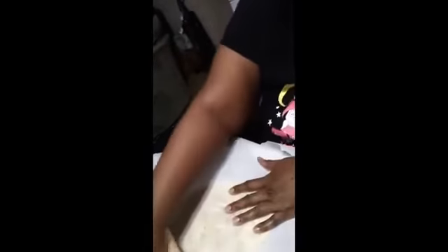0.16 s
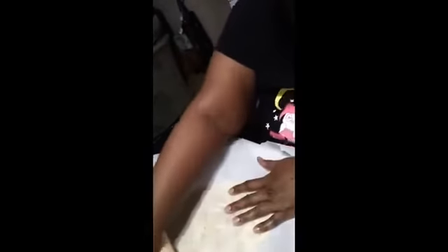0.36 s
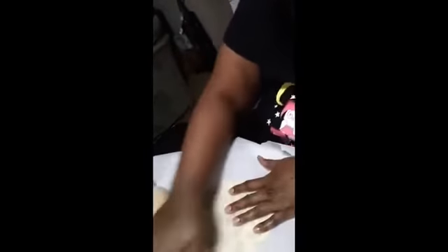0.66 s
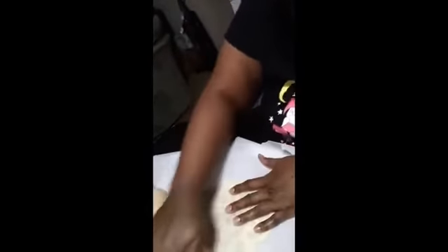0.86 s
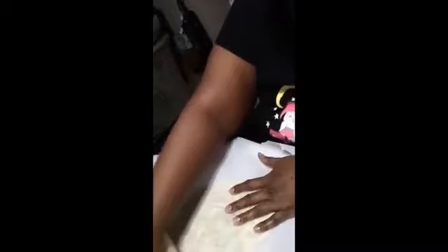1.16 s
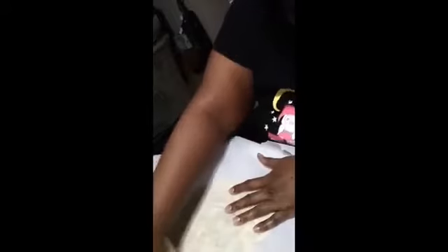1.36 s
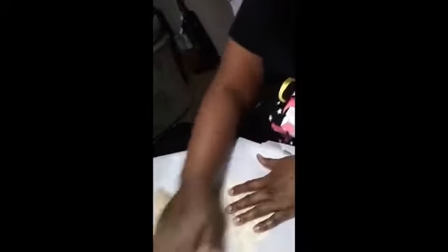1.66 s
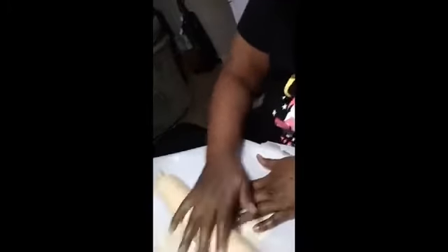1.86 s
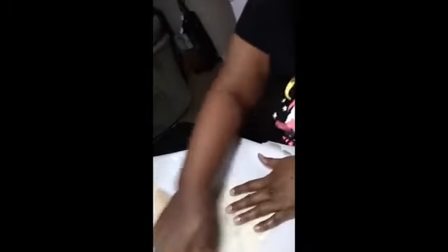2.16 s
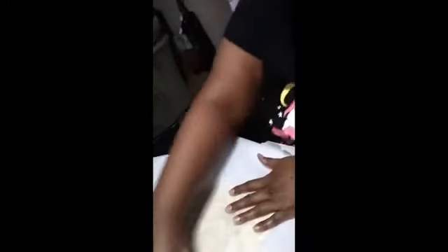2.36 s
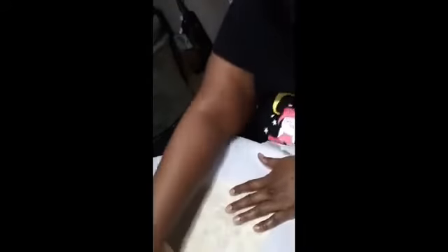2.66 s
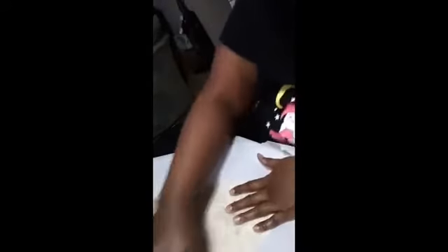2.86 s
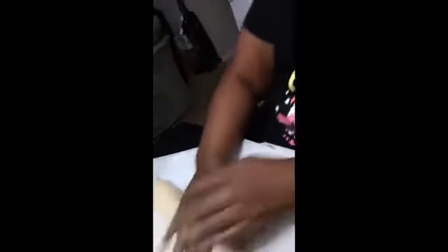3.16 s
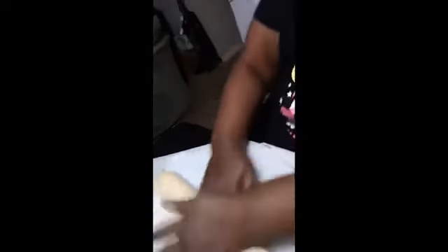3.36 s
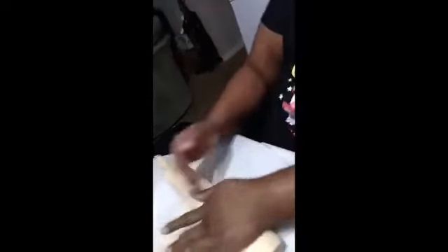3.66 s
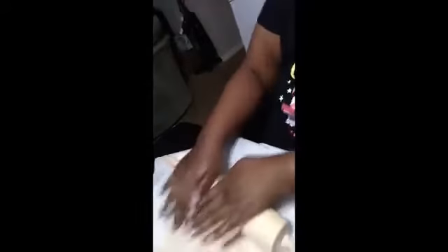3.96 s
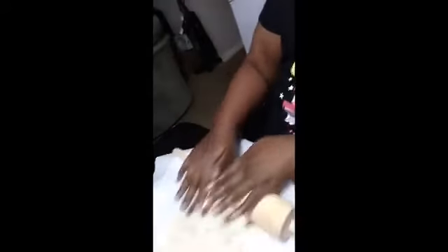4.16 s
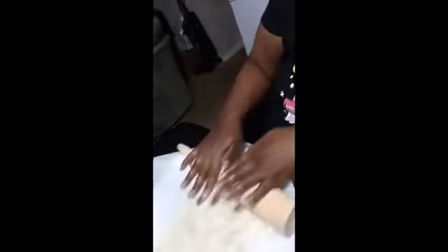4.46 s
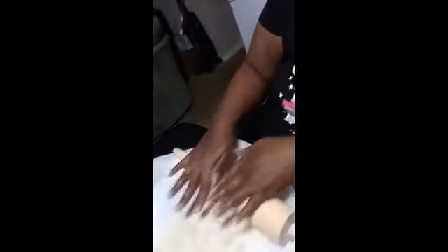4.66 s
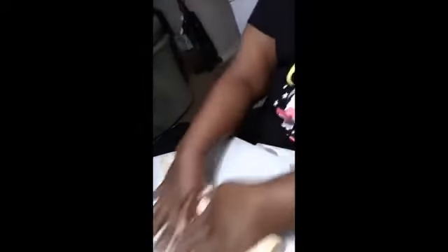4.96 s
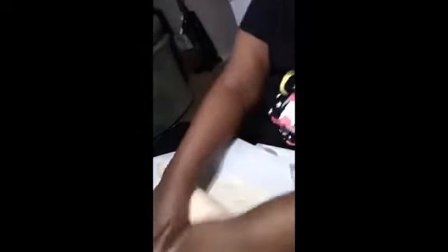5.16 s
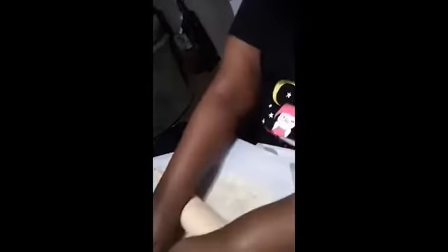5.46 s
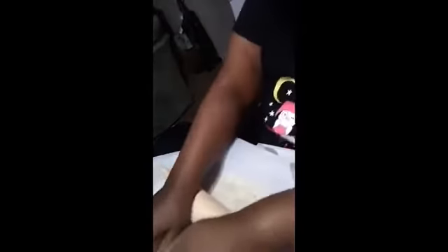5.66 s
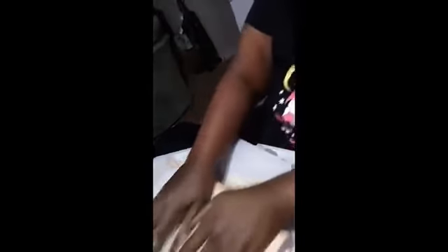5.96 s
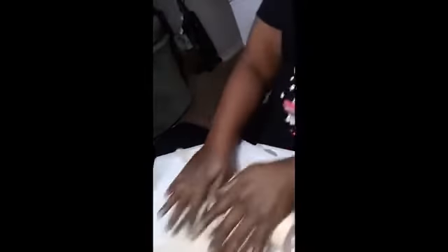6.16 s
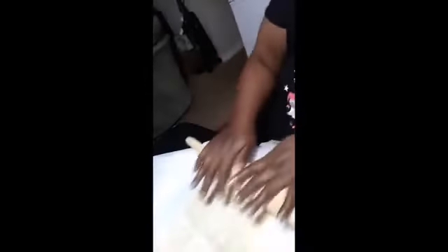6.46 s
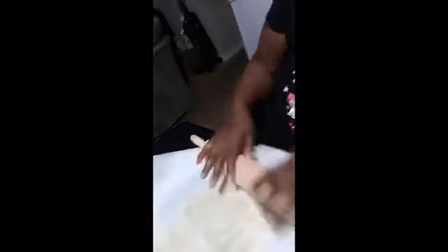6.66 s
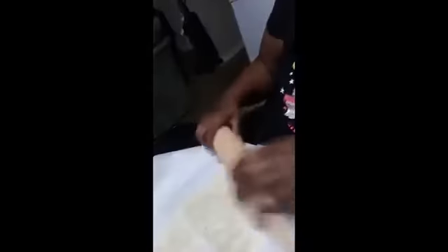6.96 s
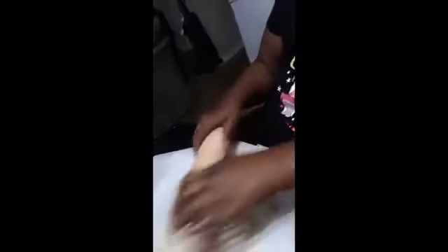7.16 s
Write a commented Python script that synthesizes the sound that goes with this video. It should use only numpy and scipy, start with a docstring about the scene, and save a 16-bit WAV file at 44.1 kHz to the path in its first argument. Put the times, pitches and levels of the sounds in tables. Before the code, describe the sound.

Hands work a wooden pin over paper-covered dough on a kitchen counter. The sheet crinkles busily, its creases ticking and popping, with low flutter beneath each stroke. After about four seconds the snapping becomes sparser, with a longer papery slide near five seconds and dull bumps near seven. Close microphones, little reverberation, quiet room.

```python
"""Parchment paper rubs under a wooden pin rolling out dough, close to two microphones: noise powered by
friction, tiny crackles, bursts at each push and creases snapping. Later the hands slide it with a smoother swish.
Panels pop (single modes) and the sheet flutters (low noise). The pin trundles (uneven low noise) and knocks
softly (ringing modes of counter and wood), over the low air noise and faint sine hum of a small kitchen."""
import sys
import numpy as np
from scipy import signal
from scipy.fft import rfft, irfft, next_fast_len
from scipy.io import wavfile
from scipy.ndimage import uniform_filter1d, map_coordinates

SR = 44100
rng = np.random.default_rng(int(sys.argv[2]) if len(sys.argv) > 2 else 0)


def transcribe(signal):
    """Save signal, clipped to [-1, 1], as a 16-bit WAV file at the path in sys.argv[1]."""
    frames = np.atleast_2d(signal).T
    limited = np.clip(frames, -1, 1)
    pcm = np.round(limited * 32767).astype(np.int16)
    wavfile.write(sys.argv[1], SR, pcm)


N = 321930
TIME_S = np.arange(N) / SR
PADDED = 2 * next_fast_len(N // 2 + 4096)
FREQ_HZ = np.maximum(np.arange(PADDED // 2 + 1) * SR / PADDED, 1)

# All dB columns are relative unless marked RMS.
# bursts of rustle as the sheet is pushed or dragged: [t/s, length/s, level/dB, body/dB, crispness/dB]
PUSHES = [(0.108,0.031,-41,-13,-2), (0.282,0.039,-35,0,-10), (0.467,0.24,-34.5,-1,-3),
          (0.695,0.045,-25.5,-3.5,-3.5), (0.764,0.067,-25,-3.5,-4), (0.972,0.016,-29,-4,-4),
          (1.141,0.025,-25.5,-9,-6.5), (1.314,0.016,-28.5,-9,-4), (1.41,0.12,-36,-6,1),
          (1.53,0.027,-25,-3.5,-5.5), (1.692,0.009,-32,-17,-4), (1.744,0.073,-34,-1,-4),
          (1.836,0.04,-43.5,1,13), (2.091,0.11,-45,3.5,3), (2.29,0.18,-36,-1.5,-6), (2.482,0.032,-32,-4,-4),
          (2.697,0.0072,-22,-9,-6.5), (2.85,0.079,-42,3,-6), (3.017,0.12,-25,-4.5,-4),
          (3.094,0.037,-20.5,-5,-2), (3.22,0.057,-36.5,-1.5,-2), (3.362,0.18,-33,-1.5,2),
          (3.617,0.14,-29,-9,0), (3.834,0.027,-38,-24,5.5), (3.942,0.12,-28,-8.5,-9),
          (4.104,0.026,-26.5,-8,-8), (4.228,0.034,-30.5,-9,-2.5), (4.325,0.031,-26.5,-10.5,-5),
          (4.61,0.04,-43,-7,2.5), (4.73,0.018,-34.5,-6,-4), (4.96,0.03,-33,-1.5,-14),
          (5.086,0.19,-25.5,-12,1), (5.326,0.077,-27.5,-7.5,3), (5.559,0.024,-35.5,-26,6),
          (5.705,0.017,-36.5,-8,-4), (6.23,0.14,-38,-2,-9), (6.498,0.0079,-34.5,-5,-3),
          (6.603,0.023,-32,-8,-13), (6.762,0.08,-33,-8.5,-2), (6.927,0.13,-36.5,-4,-3.5)]
PUSH_ATTACK_S, PUSH_RELEASE_S, PUSH_SAG_DB_PER_S = 0.014, 0.032, 5
# below this share of crackles the sheet slides: attack grows by up to SLIDE_SWELL_S
SLIDE_SWELL_S, SLIDE_BELOW_SHARE = 0.13, 0.39
# light rubbing between pushes, nearly silent when the pin rests or is lifted: [t/s, level/dB]
RUBBING = [(0, -35), (.24, -40), (.6, -36), (.92, -39), (1.03, -43), (1.08, -38), (1.22, -40.5),
           (1.95, -39.5), (2.03, -48.5), (2.14, -42.5), (2.9, -37), (3.9, -44), (4.46, -41), (4.57, -70),
           (4.62, -44), (5.3, -37.5), (5.9, -40), (7.09, -47.5), (7.17, -52), (7.21, -60.5), (7.3, -72)]
# tone of the light rubbing, fuller under the first strokes: [t/s, body/dB, crispness/dB]
RUB_TONE = [(0, 1, -3.5), (1.9, -0.5, -3), (3.7, -1.5, -3.5), (4.2, -2.5, -5.5), (5.2, -5, -6), (6, -3, -5),
            (7.3, -4, 3.5)]
# share of rustle that is tiny crackles, the rest being smooth friction: [t/s, share/0-1]
CRINKLE_SHARE = [(0, 0.56), (1.9, 0.62), (3.7, 0.63), (4.1, 0.35), (4.5, 0.37), (4.9, 0.7), (5.1, 0.17),
                 (5.45, 0.06), (5.9, 0.57), (6.6, 0.27), (6.9, 0.27), (7.3, 0.48)]
# creases snapping through: [t/s, level/dB, body/dB, brightness/dB, length scale/s]
SNAPS = [(0.057, -22, -10.0, 0, 0.0015), (0.0677, -30, 0, 5, 0.0021), (0.0912, -29, -1, 13, 0.0012),
         (0.1074, -14.5, -8, 3, 0.0022), (0.192, -25.5, 1, 4.5, 0.0021), (0.2833, -21.5, 1.5, 7, 0.002),
         (0.3139, -18.5, -0.5, 6, 0.0035), (0.3472, -23.5, -15, 3.5, 0.0047),
         (0.409, -21.5, -5, 0.5, 0.003), (0.426, -17, -14.5, -1, 0.0021), (0.5229, -28, -8, 10.5, 0.002),
         (0.5664, -21.5, -4, -6, 0.003), (0.6037, -27.5, 5.5, 6, 0.0017), (0.6198, -21, -5, -2, 0.0018),
         (0.6397, -18, -2.5, 2.5, 0.0042), (0.6639, -16.5, -17, -1, 0.0035),
         (0.6728, -17, -7.5, -4, 0.0026), (0.7558, -14, -7.5, 0.5, 0.0021), (0.8019, -16.5, -16, 1, 0.002),
         (0.8137, -21.5, -15, 7.5, 0.0028), (0.8502, -20, -2, -8, 0.0039), (0.8594, -14, -8, -1.5, 0.0039),
         (0.9556, -20, -3, 1, 0.0019), (0.9879, -15, -6.5, 4.5, 0.002), (1.0218, -17.5, -1, -4, 0.0013),
         (1.0485, -19.5, -1, 3, 0.0022), (1.1065, -22, -6.5, 0, 0.002), (1.1485, -23, -3, 7.5, 0.0035),
         (1.1587, -20, 1, 4.5, 0.0032), (1.2442, -26.5, -5.5, 5, 0.0045), (1.2908, -23, -2, 4, 0.0019),
         (1.3103, -17, -13, 6, 0.0021), (1.3213, -21, -19, 6, 0.003), (1.324, -20, 0, -0.5, 0.0019),
         (1.3504, -19, -6, 5, 0.0015), (1.5017, -18.5, -4, 10, 0.0014), (1.5402, -17, -15, 3.5, 0.0041),
         (1.6241, -20.5, -2, 5, 0.0023), (1.6629, -20.5, -11, 5, 0.0022), (1.694, -18.5, -3, 1, 0.0019),
         (1.6985, -16.5, -6, 5.5, 0.003), (1.7512, -20, -1, 3, 0.0026), (1.8233, -19, 0, 3, 0.0033),
         (1.8274, -17, -1, 4, 0.0015), (1.8997, -30.5, -12, 7, 0.003), (1.9762, -25.5, -0.5, -17, 0.002),
         (2.0356, -34.5, -6, -5.5, 0.0039), (2.0974, -27, -6.5, -12, 0.0016), (2.1264, -22, -5, -6, 0.0011),
         (2.1415, -25, -9, 4, 0.0018), (2.1953, -25, -1.5, 1.5, 0.0016), (2.2767, -24.5, -2, 1, 0.0023),
         (2.3256, -22, -3, -3, 0.0028), (2.3728, -22.5, -11, 9, 0.0016), (2.4558, -17, -2, 6, 0.0019),
         (2.5039, -23.5, -3, 5.5, 0.0032), (2.5301, -19, -3.5, 0, 0.0016), (2.5993, -25, -6, 1, 0.0017),
         (2.6278, -24.5, -8, 5.5, 0.0014), (2.6153, -22, -8, -1, 0.0019), (2.6367, -26, 1, 4, 0.0013),
         (2.666, -14, -16, 1.5, 0.0019), (2.7085, -15, -6.5, -1, 0.0025), (2.821, -25, -2, 0, 0.0026),
         (2.8508, -22.5, -3, 2, 0.0029), (2.9094, -28.5, 6, 0, 0.0026), (2.8656, -20, 1, 3, 0.0015),
         (2.8969, -25, -4, -1, 0.0026), (2.9319, -14, -4.5, -1, 0.0028), (2.983, -15.5, -6, 5.5, 0.0017),
         (3.0455, -19, -2, 8.0, 0.0012), (3.0595, -21, -4, 6, 0.0031), (3.0961, -19, -17, -1, 0.0079),
         (3.1102, -11.5, -3, 6, 0.002), (3.1227, -25, 0, -8, 0.0028), (3.1441, -19, -11, 0, 0.0063),
         (3.2198, -24.5, -2, 4.5, 0.0046), (3.2326, -18, -6.5, 7, 0.0021), (3.3654, -9, -14.5, 4, 0.0014),
         (3.3751, -17, 1.5, 2, 0.0009), (3.4029, -19, 2, 6, 0.0011), (3.497, -23.5, -3.5, 0, 0.0033),
         (3.5186, -18, -12.5, 3.5, 0.0059), (3.5618, -20, -5, -5, 0.0012), (3.6124, -27, -0.5, 5, 0.0049),
         (3.6388, -32, 2.5, 9, 0.0056), (3.6934, -16, -7.5, 5.5, 0.0046), (3.7646, -27, -10, 3, 0.0056),
         (3.832, -30, -14, 7, 0.0022), (3.9589, -27.5, -17, 13, 0.0021), (3.9842, -28.5, 1, 4, 0.0048),
         (4.0101, -16, -12, -6, 0.0025), (4.1062, -17.5, -15, -3.5, 0.0022), (4.1271, -14, -49, -5, 0.0021),
         (4.2484, -25, -12, -4, 0.0018), (4.3412, -14.5, -7, -1.5, 0.0015),
         (4.7375, -28.5, -15, -3, 0.0029), (4.8571, -40, -3, 3, 0.0032), (4.8818, -32, -11, 12.5, 0.00092),
         (4.9058, -25.5, -5.5, -2, 0.0022), (4.9668, -23.5, -11, -9, 0.0044),
         (4.9875, -18.5, -19, 0, 0.0018), (5.4641, -17, -15, 0, 0.0011), (5.4709, -20, -7, 2, 0.0028),
         (5.4958, -21, -9.5, -1, 0.0028), (5.8026, -25.5, -8, -4, 0.0028), (5.9185, -27, -17, -12, 0.002),
         (5.9237, -28, -5, -10, 0.0014), (6.0432, -21, -6, -9, 0.0019), (6.1166, -23.5, -10.5, -4, 0.0019),
         (6.2058, -27.5, -7, -14, 0.0021), (6.2345, -28.5, -4, -3, 0.0025),
         (6.2562, -18.5, -6.5, -2, 0.0023), (6.3087, -30.5, -5, 0, 0.0032),
         (6.4475, -30.5, -13, -1, 0.0023), (6.499, -27, -11, -6, 0.0015), (6.5143, -18.5, -9.5, -4, 0.0015),
         (6.604, -28, -8.5, 0.5, 0.0028), (6.6519, -32, -10, -2, 0.002), (6.7506, -20, -12, -1, 0.0014),
         (6.7653, -25, -5, 1, 0.0014), (6.9776, -26, -8, -8, 0.0019), (7.1243, -40.5, 0, 0, 0.0049),
         (7.1637, -35.5, -4, -13, 0.0017)]
# wall reflections of each snap: [delay/s, level/dB]
ECHOES = [(0.0098, -13.5), (0.017, -21.5)]
# wide panels, small facets, crease tips: [low/Hz, high/Hz, 1/e ring after a snap/s, snap/dB, rustle/dB]
PAPER_RANGES = [(673, 3850, 0.0085, -0.5, -0.26), (3370, 8760, 0.0037, -0.83, 0.02),
                (8020, 12440, 0.0009, -0.4, 0.8)]
# colour of the paper at each microphone: [f/Hz, level/dB]
LEFT_COLOUR = [(380, -15), (600, -7), (1000, -6), (1600, 1.5), (2000, 1.5), (2600, 0.5), (3500, -2.5),
               (5700, -1.5), (8200, -5), (9800, -2), (11600, 5.5), (13000, 2), (15000, -7.5)]
RIGHT_COLOUR = [(380, -24), (600, -21), (900, -9), (1400, -7.5), (2000, -1), (3400, -3.5), (4400, -2.5),
                (5800, 1.5), (7000, -6), (8200, -12.5), (10000, -27), (15000, -28)]
# taut panels buckling with a pitched pop: [t/s, f/Hz, level/dB]
POPS = [(0.4264, 1875, -11), (0.804, 1710, -16.5), (1.5403, 1560, -18), (3.096, 2040, -14),
        (3.109, 1450, -18), (3.444, 2740, -18), (6.381, 1230, -28.5)]
# low flutter of the sheet, strong while the pin travels, weak where it turns round: [t/s, level/dB]
FLUTTER = [(0.05, -60.5), (0.22, -66), (0.34, -63.5), (0.55, -53.5), (0.82, -50), (1.25, -58.5), (1.6, -49),
           (2.1, -67.5), (2.4, -55), (2.6, -54.5), (3.12, -46.5), (3.3, -55.5), (3.45, -55), (3.7, -48),
           (3.86, -69), (4.05, -49.5), (4.38, -59), (4.5, -78), (4.66, -55.5), (4.9, -64.5), (5.03, -52),
           (5.23, -63.5), (5.42, -53), (5.62, -79), (5.72, -49), (5.85, -51.5), (6.0, -62.5), (6.27, -57.5),
           (6.42, -59.5), (6.54, -75), (6.82, -56.5), (7.08, -48.5), (7.22, -89)]
# colour of the whole sheet flapping: [f/Hz, level/dB]
FLAP_COLOUR = [(100, -33), (250, 1.5), (400, -0.5), (600, 1), (800, -15), (1300, -1.5), (4000, -58)]
# the pin bumping on the counter: [t/s, thud/dB, wooden clack/dB]
KNOCKS = [(1.048, -33, -47), (2.175, -36, -60), (2.704, -56, -37.5), (3.362, -34, -46), (3.88, -39.5, -68),
          (4.31, -35.5, -43), (4.554, -39.5, -54.5), (4.684, -43, -71.5), (5.689, -42, -58),
          (5.742, -41, -41.5), (6.522, -47, -72), (6.776, -31, -39.5), (6.94, -20, -44), (7.022, -33, -40),
          (7.148, -40, -75.5)]
# modes of counter and pin together: [f/Hz, level/dB, t60/s]
COUNTER_MODES = [(98, -8.5, 0.13), (134.6, -1, 0.25), (192, -2.5, 0.1), (228, 3.5, 0.11), (298, 2, 0.072),
                 (350.4, 0.5, 0.14), (500, -10.5, 0.091), (716, -25, .05)]
# modes of the wooden pin: [f/Hz, level/dB, t60/s]
PIN_MODES = [(386, -1.5, 0.1), (530, -1, 0.088), (682, -3, 0.096), (807, -2, 0.068), (1030, 0, .05)]
# colour of the rolling pin: [f/Hz, level/dB]
ROLLING_COLOUR = [(25, -12), (60, -9), (130, -1.5), (220, -5), (310, -14), (420, -52), (1500, -76)]
# colour of the room air: [f/Hz, level/dB]
AIR_COLOUR = [(25, 5), (60, 41), (150, -11), (400, -26), (1500, -18), (6000, -27), (15000, -20)]
# faint hum, swelling and sinking: [t/s, RMS level at the left/dB]
HUM = [(0, -50), (3.4, -55), (4.2, -95), (5, -68), (5.7, -46), (7.3, -54)]
# likeness of the two microphones: [f/Hz, coherence/0-1]
COHERENCE = [(60, 1), (150, 1), (300, 0.32), (500, 0), (780, 0.17), (1100, 0.52), (2100, 0.3), (2700, 0.5),
             (4200, 0.15), (5700, 0.42), (6800, 0.78), (8000, 0.28)]
# phase between the two ports, left ahead where positive: [f/Hz, lead/rad]
PORT_LEAD = [(60, 2), (600, 2.5), (1000, 2), (1700, 0), (2300, 1.3), (3100, -2.5), (3900, -3), (4400, -6),
             (8000, -6.5)]
HUM_HZ, AIR_RMS_DB, CUTOFF_HZ = 59, -61, 15400


def from_db(db):
    """Decibels to amplitude gain."""
    return 10 ** (np.asarray(db) / 20)


def in_time(rows):
    """Columns of a time table, interpolated at every sample."""
    t_s, *columns = np.transpose(rows)
    return [np.interp(TIME_S, t_s, column) for column in columns]


def over_hz(points):
    """Spectrum table, interpolated over log frequency."""
    hz, value = np.transpose(points)
    return np.interp(np.log(FREQ_HZ), np.log(hz), value)


def clicks(times_s, sizes):
    """Single-sample impulses."""
    out = np.zeros(N)
    at = np.clip(np.round(times_s * SR).astype(int), 0, N - 1)
    np.add.at(out, at, sizes)
    return out


def fade(power, decay_s):
    """Spread energy over an exponential tail whose amplitude falls by 1/e in decay_s."""
    pole = np.exp(-2 / (decay_s * SR))
    return signal.lfilter([1 - pole], [1, -pole], power + 1e-18)


def ring(blows, hz, t60_s):
    """Two-pole mode: a unit click rings at height 1, with little below its pitch."""
    radius, angle = from_db(-60 / (t60_s * SR)), 2 * np.pi * hz / SR
    poles = [1, -2 * radius * np.cos(angle), radius * radius]
    return signal.lfilter([.5, 0, -.5], poles, blows + 1e-18)


def stereo_noise(power, response):
    """Coloured noise following a power envelope, partly coherent between the microphones."""
    mid, side = rfft(rng.standard_normal((2, N)) * np.sqrt(power), PADDED)
    coherence = np.clip(over_hz(COHERENCE), 0, .95)
    shared = np.sqrt((1 + coherence) / 2) * mid
    apart = np.sqrt((1 - coherence) / 2) * side
    pair = np.array([shared + apart, (shared - apart) * np.exp(-1j * over_hz(PORT_LEAD))])
    unit_response = response / np.sqrt(np.mean(response ** 2))
    return irfft(pair * unit_response, PADDED)[:, :N]


def at_ports(x, right_db):
    """One clean vibration at both microphones, weaker and phase-shifted on the right."""
    right = irfft(rfft(x, PADDED) * np.exp(-1j * over_hz(PORT_LEAD)), PADDED)[:N]
    return np.array([x, from_db(right_db) * right])


def crackles(per_s, spread_db, decay_s, rise_share=0.26):
    """Power of countless tiny slips of uneven size, levelled to a short-term mean of about 1."""
    sizes = from_db(spread_db * np.minimum(rng.exponential(1, N), 4)) ** 2
    slips = sizes * (rng.random(N) < per_s / SR)
    power = fade(fade(slips, rise_share * decay_s), decay_s)
    return power / (uniform_filter1d(power, size=2600) + 1e-9)


def rustle_power():
    """Rustle power in three ranges: light rubbing, plus pushes that rise, sag and die away."""
    rub_db, = in_time(RUBBING)
    body_db, crisp_db = in_time(RUB_TONE)
    power = from_db([rub_db + body_db, rub_db, rub_db + crisp_db]) ** 2
    for start_s, length_s, level_db, body_db, crisp_db in PUSHES:
        t_s = TIME_S - start_s
        share = np.interp(start_s + length_s / 2, *np.transpose(CRINKLE_SHARE))
        sliding = max(0, 1 - share / SLIDE_BELOW_SHARE)
        attack = np.clip(t_s / (PUSH_ATTACK_S + sliding * SLIDE_SWELL_S) + .5, 0, 1)
        release = np.exp(-np.clip((t_s - length_s) / PUSH_RELEASE_S, 0, 20))
        sag = from_db(-PUSH_SAG_DB_PER_S * np.clip(t_s, 0, length_s))
        gains = from_db(level_db + np.array([[body_db], [0], [crisp_db]]))
        power = power + (gains * attack * release * sag) ** 2
    return power


def all_snaps(rustle, per_s=45, over_rustle_db=5.5, scatter_db=5.0, bright_db=3,
              colour_scatter_db=3.5, length_s=0.0022, count=400):
    """Listed snaps plus small random ticks that take the rustle's colour and multiply where it crinkles."""
    when, chance = rng.random((2, count))
    size, tint = np.clip(rng.standard_normal((2, count)), -2, 1)
    at = (when * N).astype(int)
    share = np.clip(in_time(CRINKLE_SHARE)[0][at], .01, 1)
    panels_db, facets_db, tips_db = 10 * np.log10(rustle[:, at])
    level_db = facets_db + 20 * np.log10(share) + over_rustle_db + scatter_db * size
    body_db = panels_db - facets_db
    colour_db = tips_db - facets_db + bright_db + colour_scatter_db * tint
    small = np.transpose([at / SR, level_db, body_db, colour_db, np.full(count, length_s)])
    kept = chance < share ** 2 * per_s * N / SR / count
    return np.vstack([SNAPS, small[kept]]).T


def snap_power(times_s, levels_db, lengths_s, ring_s, peak_db=2.5, shiver_s=0.0038):
    """A crease flips within a few ms; after a short gap the walls send it back, smeared."""
    jolts, t_s = np.zeros(N + SR), TIME_S[:SR // 40]
    for time_s, db, length_s in zip(times_s, levels_db, lengths_s):
        shape = (1 - np.exp(-t_s / .0003)) * np.exp(-(t_s / (1.2 * length_s)) ** 2)
        start = int(time_s * SR)
        jolts[start:start + len(t_s)] += (from_db(db + peak_db) * shape) ** 2
    flip = fade(jolts[:N], ring_s)
    echoes = sum(from_db(db) ** 2 * np.interp(TIME_S - delay_s, TIME_S, flip) for delay_s, db in ECHOES)
    return flip + fade(echoes, shiver_s)


def flexing(x, depth_db=5.0, width_hz=190, hold_s=.03, full_hz=3000, size=512):
    """Facets change shape as the sheet bends: narrow resonances come and go, most in the treble."""
    hz, t_s, frames = signal.stft(x, SR, nperseg=size)
    wander = rng.standard_normal((128, 512))
    place = np.meshgrid(hz / width_hz, t_s / hold_s, indexing="ij")
    depths_db = depth_db * np.minimum(hz / full_hz, 1)[:, None]
    tint_db = depths_db * map_coordinates(wander, place, order=3, mode="mirror")
    gain = from_db(signal.hilbert(tint_db, axis=0).conj())   # minimum phase: nothing rings early
    gain = gain / np.sqrt(np.mean(abs(gain) ** 2, axis=1, keepdims=True))
    return signal.istft(frames * gain, SR, nperseg=size)[1][:, :N]


def paper(rustle, snap_times_s, snap_levels_db, lengths_s):
    """Friction, crackles and snaps shake three pitch ranges; snaps are too brief for the shifting resonances."""
    share = np.clip(in_time(CRINKLE_SHARE)[0], 0, 1)
    common = crackles(per_s=380, spread_db=4.2, decay_s=0.0026, rise_share=0.3)
    colour = from_db([over_hz(LEFT_COLOUR), over_hz(RIGHT_COLOUR)])
    rubbing = cracks = 0
    for row, rubbed, levels_db in zip(PAPER_RANGES, rustle, snap_levels_db):
        low_hz, high_hz, ring_s, snap_db, rub_db = row
        own = crackles(per_s=890, spread_db=12.5, decay_s=0.0014)   # slips in this range alone
        grain = 1 - share + share * (2 * common + own) / 3
        snapping = snap_power(snap_times_s, levels_db + snap_db, lengths_s, ring_s)
        power = from_db(rub_db) ** 2 * rubbed * grain + snapping
        band = 1 / np.sqrt((1 + (low_hz / FREQ_HZ) ** 12) * (1 + (FREQ_HZ / high_hz) ** 12))
        sound = stereo_noise(power, colour * band)
        crack = sound * snapping / power
        rubbing = rubbing + sound - crack
        cracks = cracks + crack
    return flexing(rubbing) + cracks


def flaps(flutter_db, snap_times_s, panel_snaps_db, lengths_s,
          level_db=-0.5, snap_db=-19, right_db=-9, decay_s=0.02):
    """The whole sheet flutters under the moving pin and jumps a little at each snap."""
    grain = crackles(per_s=340, spread_db=3.0, decay_s=0.0036)
    flutter = from_db(flutter_db + level_db) ** 2 * grain
    jolts = snap_power(snap_times_s, panel_snaps_db + snap_db, lengths_s, decay_s)
    response = from_db(over_hz(FLAP_COLOUR)) * from_db([[0], [right_db]])
    return stereo_noise(flutter + jolts, response)


def pops(t60_s=0.026, right_db=-6):
    """A buckling panel rings briefly at its own pitch."""
    out = sum(ring(clicks(np.array([time_s]), from_db(level_db)), hz, t60_s)
              for time_s, hz, level_db in POPS)
    return at_ports(out, right_db)


def knocks(level_db=-4, right_db=-9.0, scatter_db=3.0, contact_s=0.00055):
    """Each bump, cushioned by dough, rings the counter's modes with strengths of its own."""
    times_s, thud_db, _ = np.transpose(KNOCKS)
    scatter = scatter_db * rng.standard_normal((len(times_s), len(COUNTER_MODES)))
    out = 0
    for k, (hz, mode_db, t60_s) in enumerate(COUNTER_MODES):
        blows = clicks(times_s, from_db(thud_db + mode_db + scatter[:, k] + level_db))
        cushioned = fade(fade(blows, contact_s), contact_s)
        out = out + (-1) ** k * ring(cushioned, hz, t60_s)
    return at_ports(out, right_db)


def clacks(level_db=2.5, right_db=-8, scatter_db=3):
    """The wood of the pin rings with a short dry clack at each bump."""
    times_s, _, clack_db = np.transpose(KNOCKS)
    scatter = scatter_db * rng.standard_normal((len(times_s), len(PIN_MODES)))
    out = 0
    for k, (hz, mode_db, t60_s) in enumerate(PIN_MODES):
        blows = clicks(times_s, from_db(clack_db + mode_db + scatter[:, k] + level_db))
        out = out + (-1) ** k * ring(blows, hz, t60_s)
    return at_ports(out, right_db)


def rolling(flutter_db, level_db=-52, follows=0.32, right_db=-4):
    """The pin trundles unevenly over dough and counter, louder while it travels."""
    travel_db = follows * (flutter_db - flutter_db.mean())
    bumps = crackles(per_s=100, spread_db=22.0, decay_s=0.045)
    power = from_db(level_db + travel_db) ** 2 * bumps
    return stereo_noise(power, from_db(over_hz(ROLLING_COLOUR)) * from_db([[0], [right_db]]))


def kitchen(x, t60_s=0.074, wet_db=-12, first_s=0.0063):
    """A short diffuse tail of decaying noise, different at each microphone."""
    t_s = TIME_S[:SR // 2]
    decay = np.exp(-np.log(1000) * t_s / t60_s) * (t_s > first_s)
    tail = rng.standard_normal((2, len(t_s))) * decay
    tail = tail / np.sqrt(np.sum(tail ** 2, axis=1, keepdims=True))
    return x + from_db(wet_db) * signal.fftconvolve(x, tail, axes=1)[:, :N]


def background(right_db=-4.5):
    """Steady coloured air noise and a faint sine hum, inverted and weaker on the right."""
    hum_db, = in_time(HUM)
    hum = np.sqrt(2) * from_db(hum_db) * np.sin(2 * np.pi * HUM_HZ * TIME_S)
    air = stereo_noise(from_db(AIR_RMS_DB) ** 2, from_db(over_hz(AIR_COLOUR)))
    return air + np.array([hum, -from_db(right_db) * hum])


def scene():
    """Paper and pin in the kitchen; a snap's body sounds in the wide panels, its brightness in the crease tips."""
    rustle = rustle_power()
    flutter_db, = in_time(FLUTTER)
    times_s, level_db, body_db, bright_db, lengths_s = all_snaps(rustle)
    snap_levels_db = [level_db + body_db, level_db, level_db + bright_db]
    sheet = paper(rustle, times_s, snap_levels_db, lengths_s)
    sheet = sheet + flaps(flutter_db, times_s, level_db + body_db, lengths_s)
    close = sheet + pops() + knocks() + clacks()
    return kitchen(close) + rolling(flutter_db) + background()


def record(dry):
    """The highest peaks are rounded off near full scale and the top is cut."""
    rounded = dry / (1 + (dry / .9) ** 4) ** .25
    low_pass = signal.ellip(10, .2, 75, CUTOFF_HZ, fs=SR, output="sos")
    return signal.sosfilt(low_pass, rounded)


dry = scene()
out = record(dry)
transcribe(out)
```